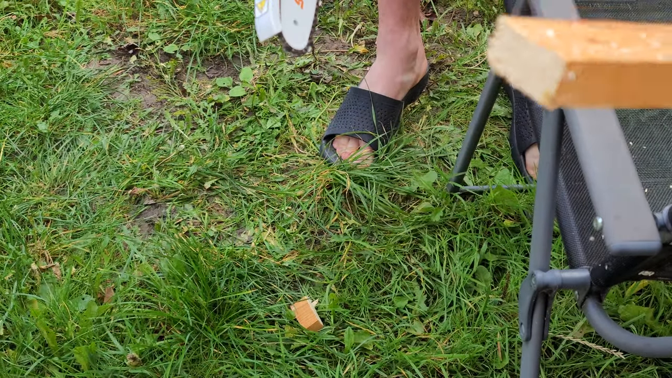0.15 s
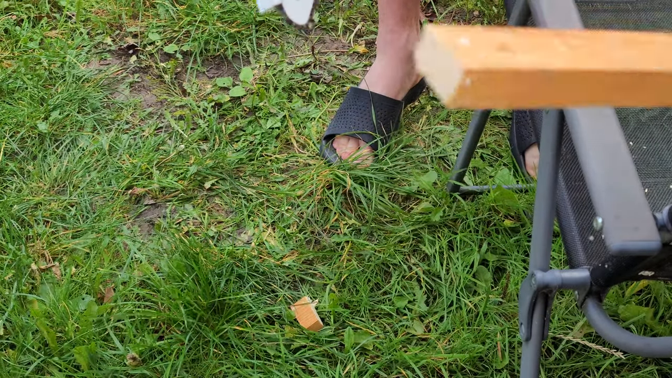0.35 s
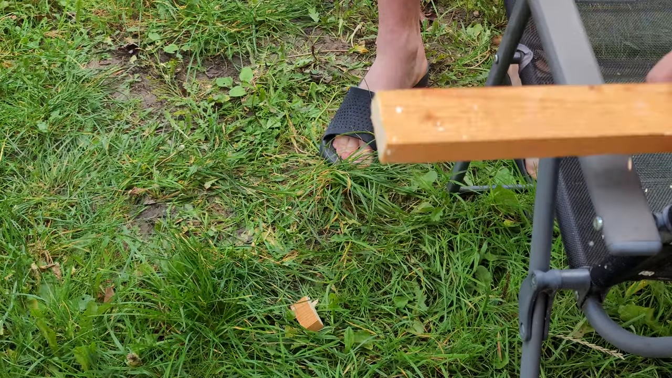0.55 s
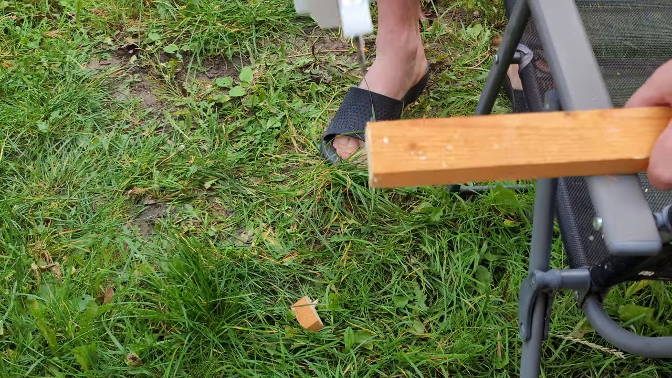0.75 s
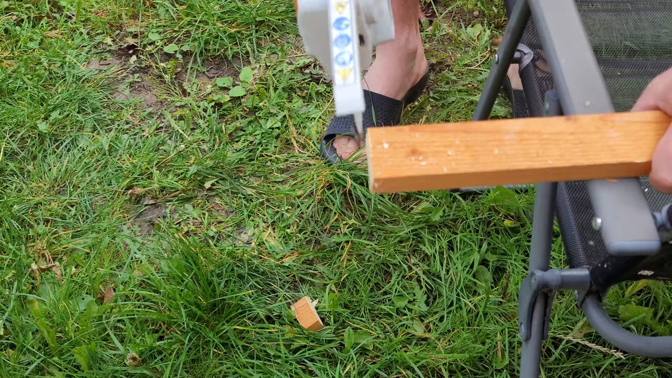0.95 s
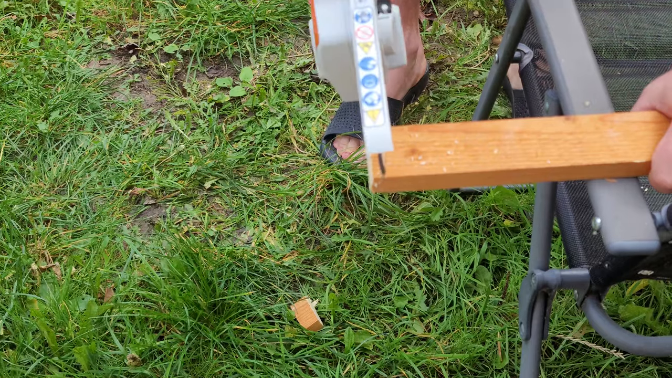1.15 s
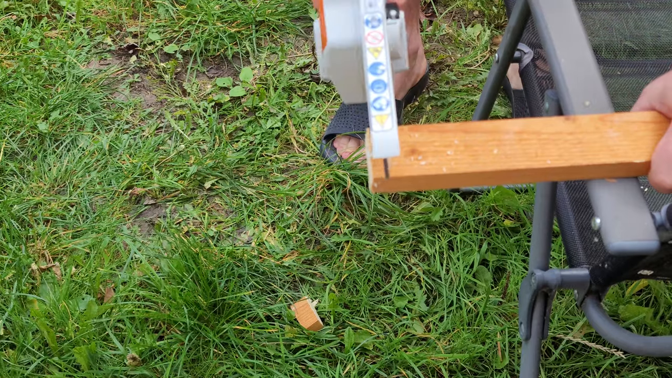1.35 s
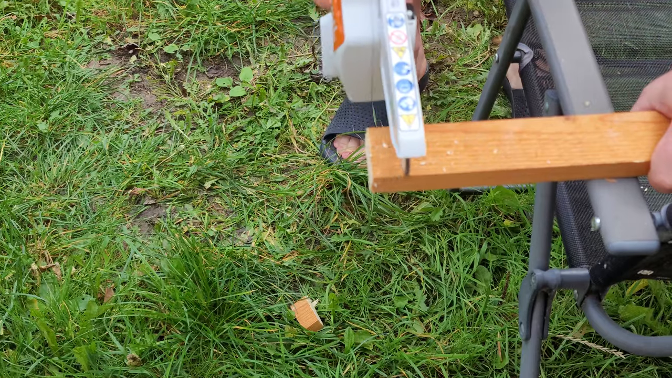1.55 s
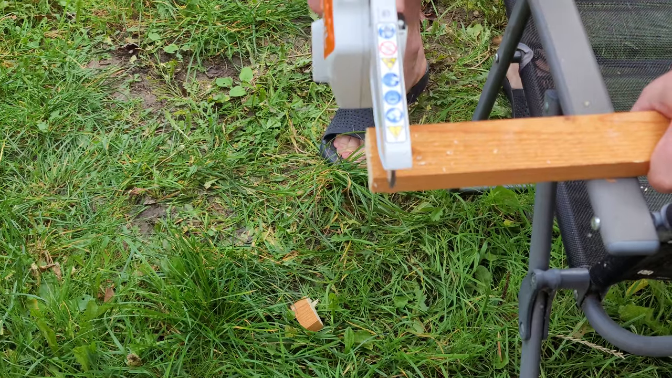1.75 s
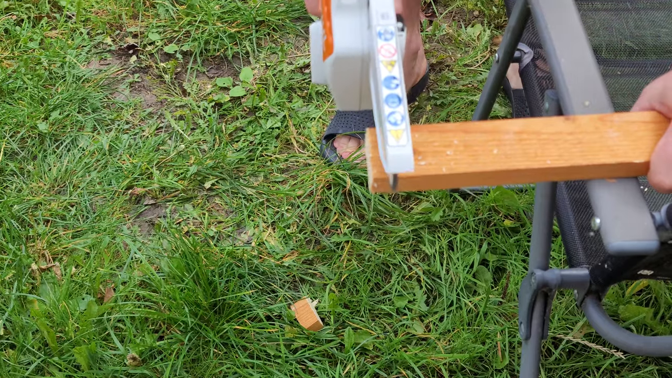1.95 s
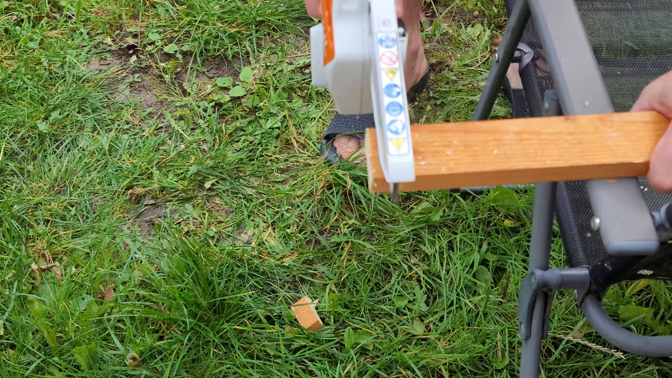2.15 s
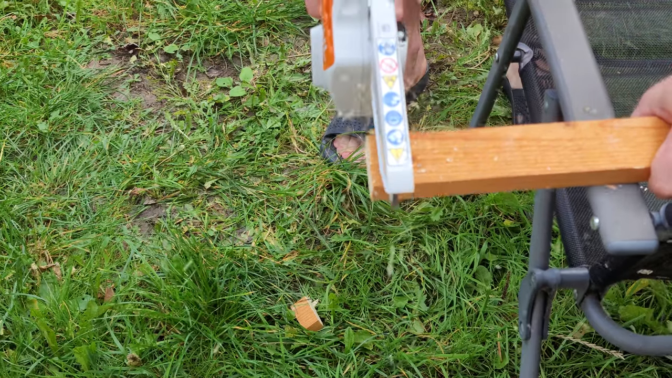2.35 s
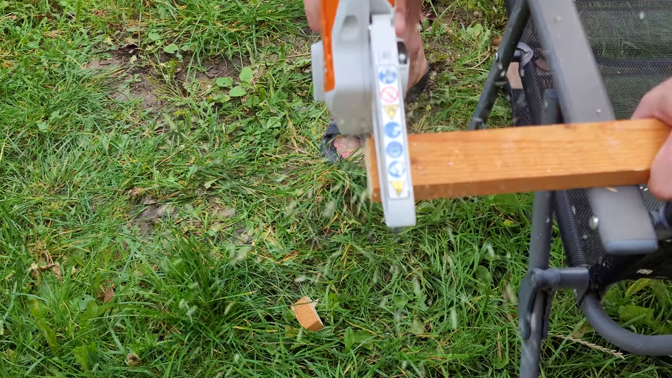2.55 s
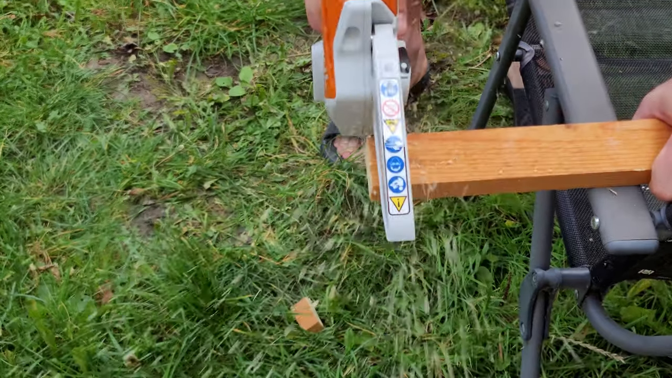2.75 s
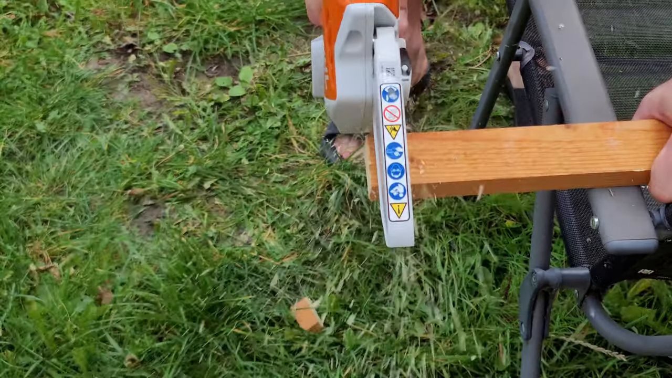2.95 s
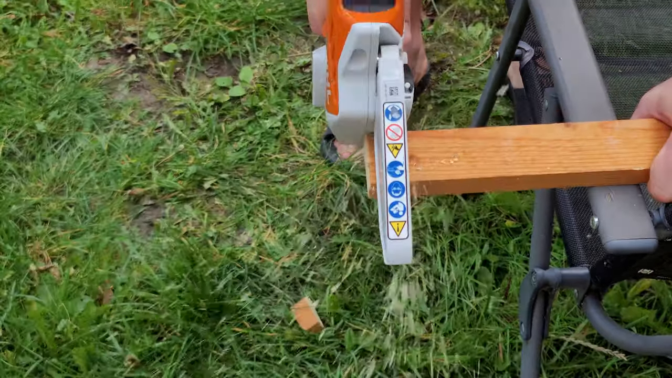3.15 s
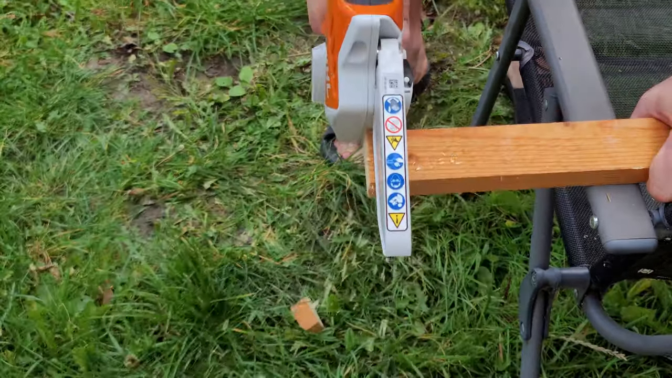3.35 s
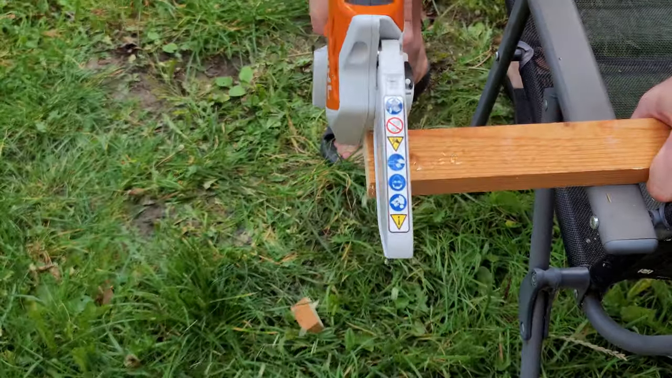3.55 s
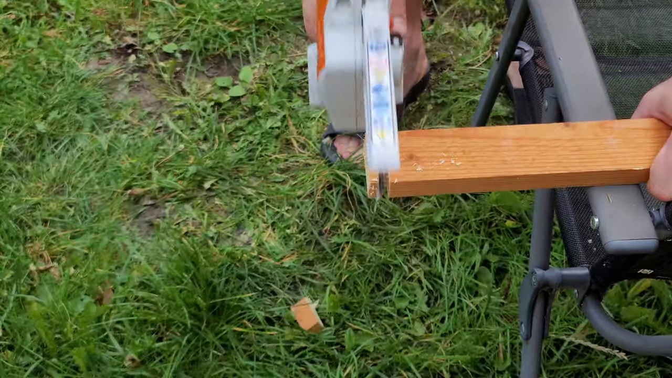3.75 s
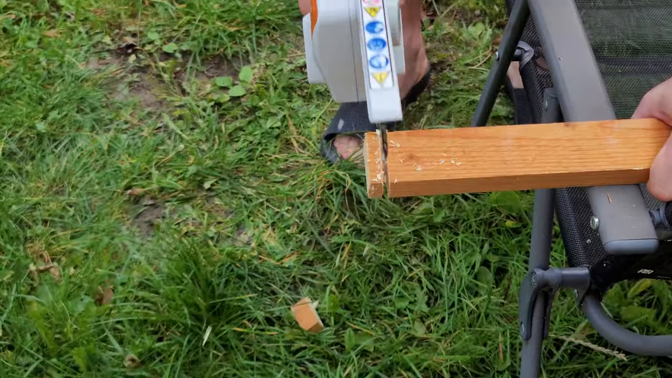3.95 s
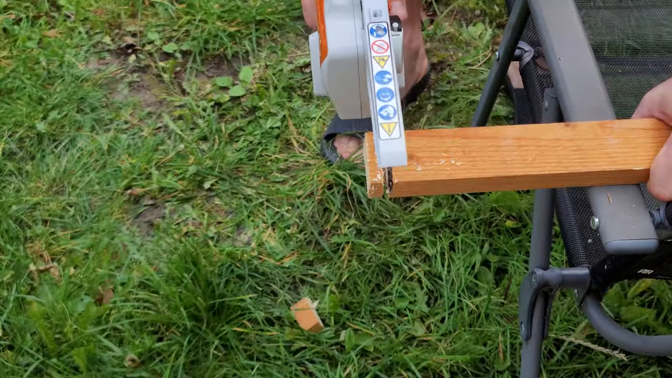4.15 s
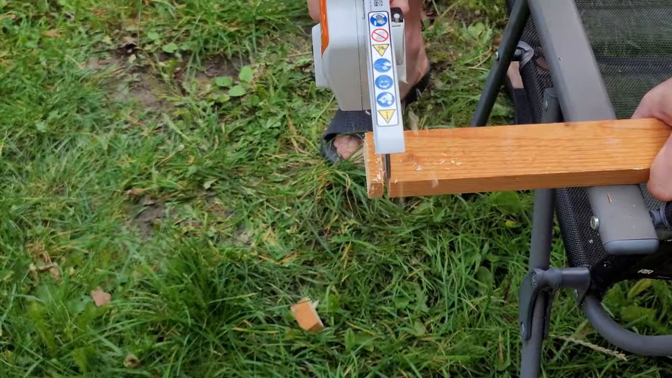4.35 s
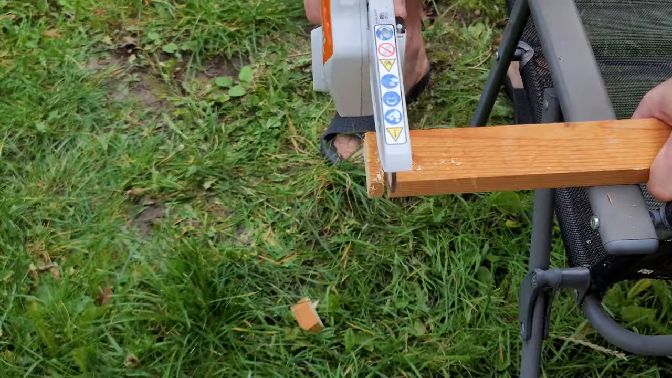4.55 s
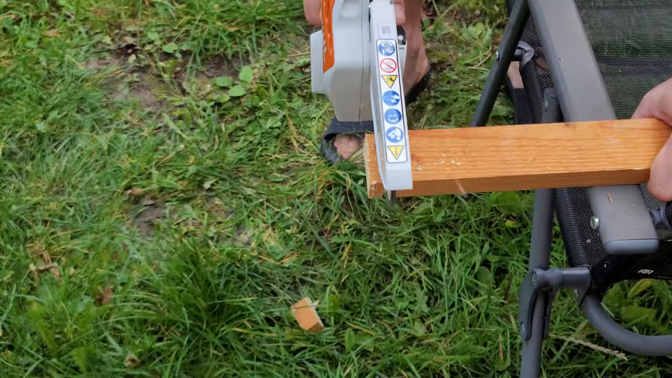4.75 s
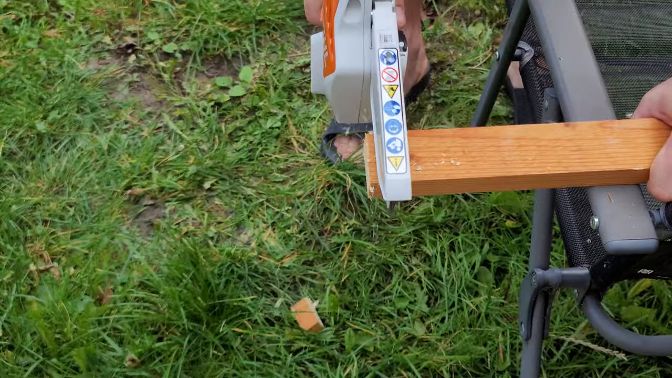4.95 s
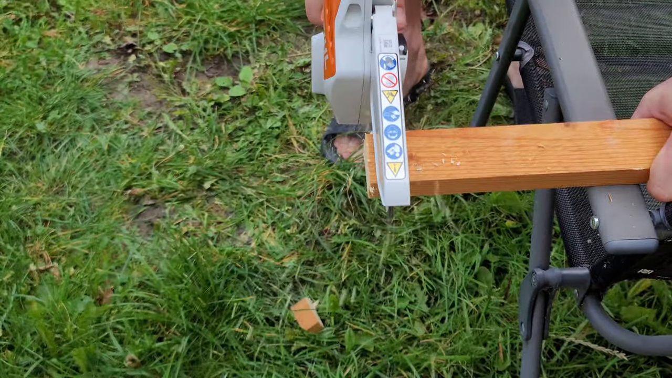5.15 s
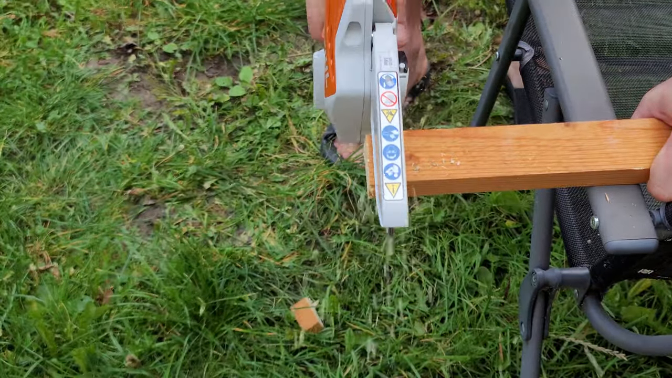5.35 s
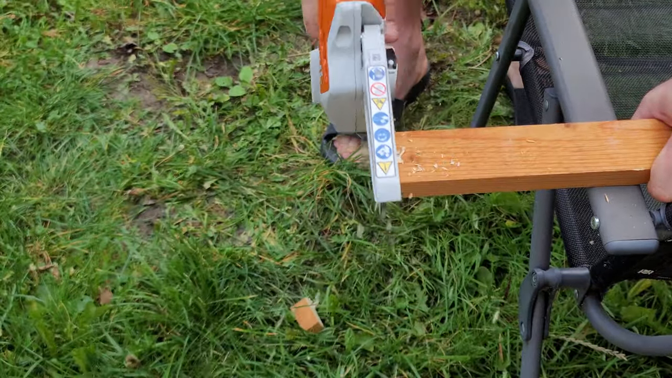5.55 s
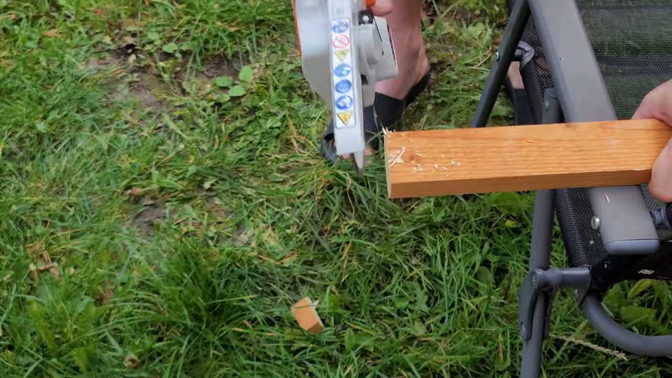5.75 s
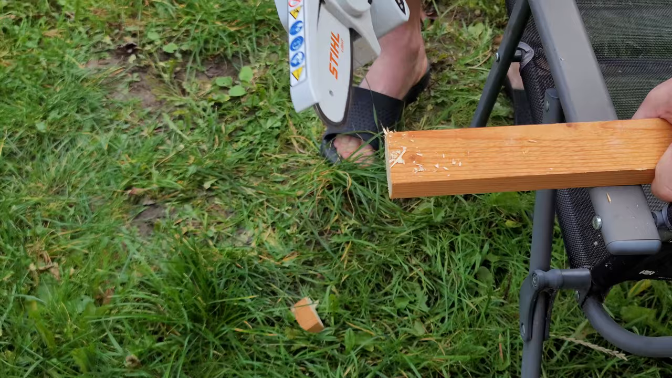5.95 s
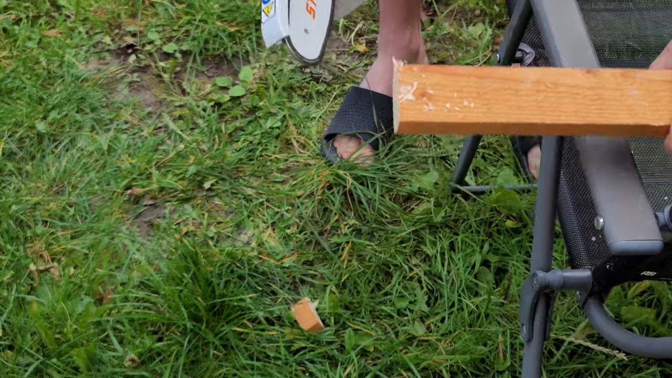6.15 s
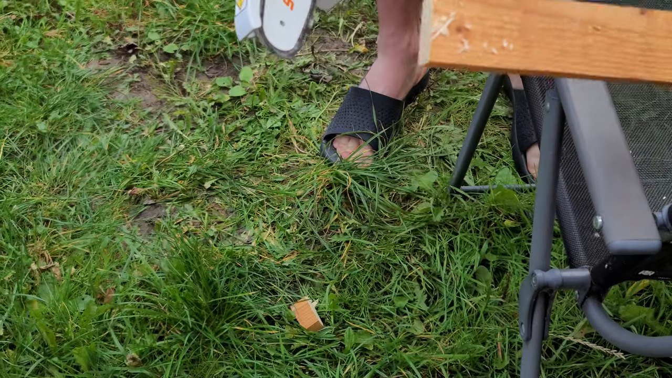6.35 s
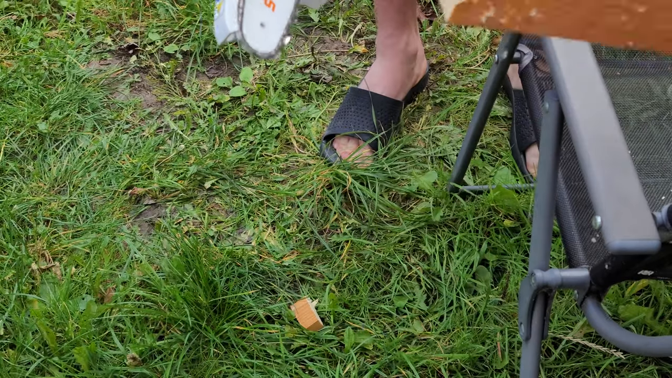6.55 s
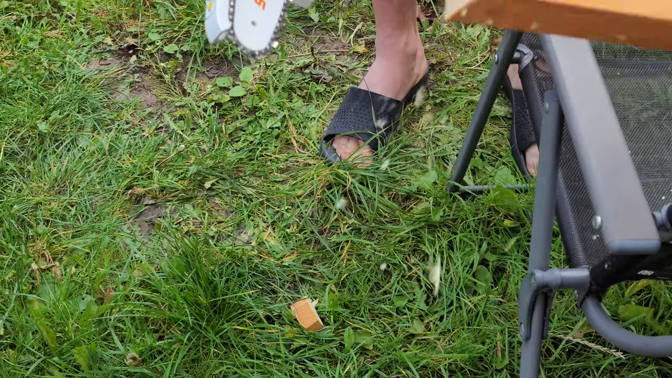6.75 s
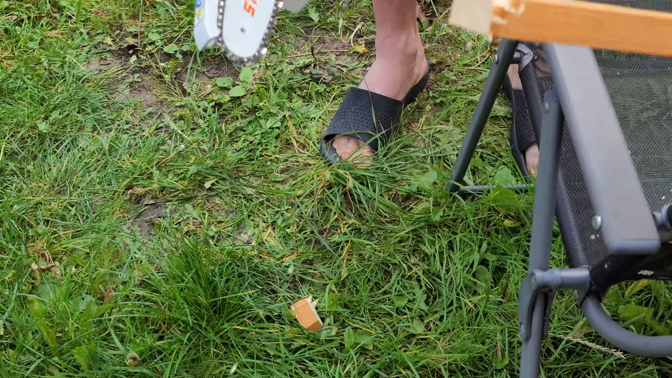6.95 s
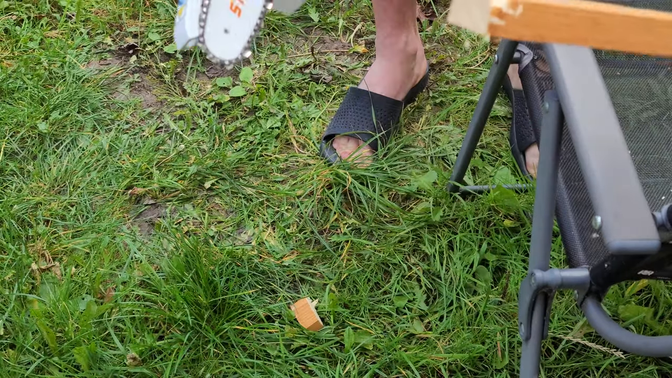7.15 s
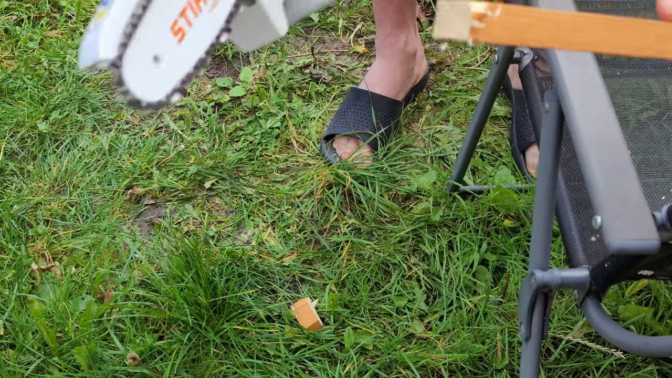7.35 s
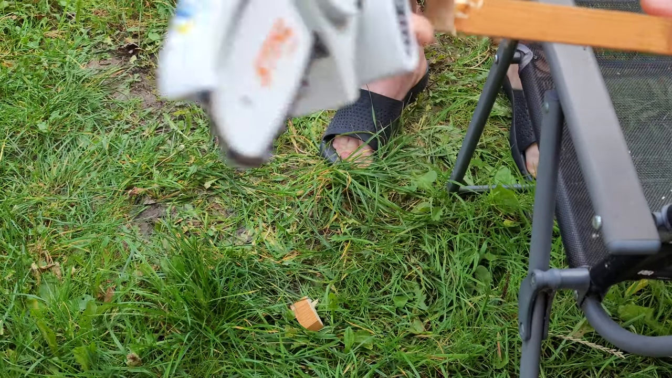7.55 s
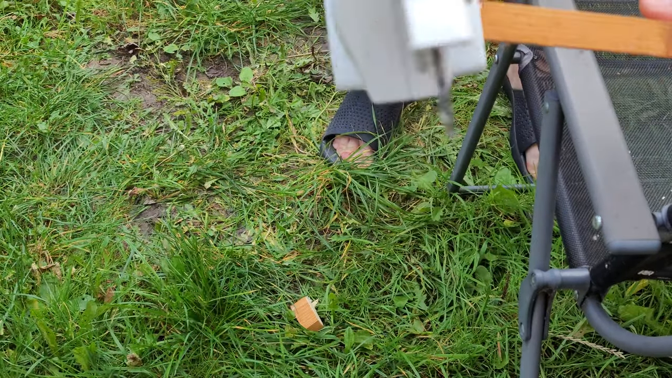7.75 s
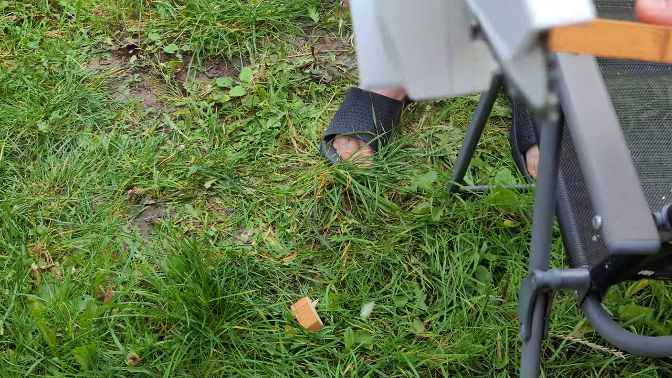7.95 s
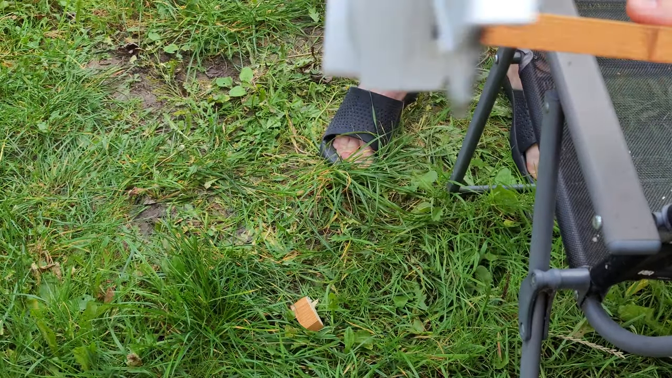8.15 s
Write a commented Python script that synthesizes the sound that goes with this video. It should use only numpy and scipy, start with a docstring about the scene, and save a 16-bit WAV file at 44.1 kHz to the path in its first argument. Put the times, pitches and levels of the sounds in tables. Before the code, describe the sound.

Two short bursts of a small electric chainsaw cutting wood in light wind, the first stalling, the second ending in a loud knock.

```python
"""On a lawn in light wind, a stereo microphone close to a small battery chainsaw and a hand-held board.
Wind puffs on the ports and the board knocks on a garden chair. At 1.1 s the saw spins up, links clattering;
its cutters tear into the wood, then it bogs down, squeals, stalls at 3.3 s and scrapes back out.
At 4.2 s it starts again, breaks through with a loud knock at 5.3 s and coasts to rest on a slack chain.
The board knocks again, and at 7.3 s something clinks far off."""
import sys
import numpy as np
from scipy import signal
from scipy.fft import rfft, irfft, next_fast_len
from scipy.io import wavfile
from scipy.ndimage import uniform_filter1d, map_coordinates

SR = 44100
rng = np.random.default_rng(int(sys.argv[2]) if len(sys.argv) > 2 else 0)


def log_audio(samples):
    """Write samples as a 16-bit WAV file to the path given in sys.argv[1]."""
    # one column per channel
    frames = np.atleast_2d(samples).T
    # limit to full scale, then quantise
    limited = np.clip(frames, -1, 1)
    pcm = np.round(limited * 32767).astype(np.int16)
    wavfile.write(sys.argv[1], SR, pcm)


N = 360738
T = np.arange(N) / SR
FREE_SPEED, LOOP_TURNS = 95, 28 / 6  # sprocket turns: per second unloaded, per lap of the chain


def amp(db):
    """Decibels to gain."""
    return 10 ** (np.asarray(db) / 20)


def unit(x):
    """Scale to rms 1."""
    return x / np.sqrt(np.mean(x ** 2) + 1e-20)


def along(points, hz):
    """(Hz, value) points read on a log axis."""
    f, v = np.transpose(points)
    return np.interp(np.log(hz + 1), np.log(f + 1), v)


def swell(s, half):
    """A bell of height 1 round time s."""
    return np.exp(-((T - s) / half) ** 2)


def wobble(rate):
    """A smooth random curve, rate knots a second."""
    return map_coordinates(rng.standard_normal(int(N * rate / SR) + 4), [T * rate])


def noise():
    """Two unrelated channels of white noise."""
    return rng.standard_normal((2, N))


def filtered(x, response):
    """x times a response of frequency."""
    m = next_fast_len(N + SR // 4)
    return irfft(rfft(x, m) * response(np.fft.rfftfreq(m, 1 / SR)), m)[..., :N]


def coloured(x, spectrum):
    """x through a (Hz, dB) spectrum."""
    return filtered(x, lambda hz: amp(along(spectrum, hz)))


def resonate(x, modes):
    """x through a body's (Hz, width, dB) resonances, alternating in sign."""
    return filtered(x, lambda f: sum((-1) ** k * amp(db) * 1j * f * w / (hz * hz - f * f + 1j * f * w)
                                     for k, (hz, w, db) in enumerate(modes)))


def spread(pair, likeness):
    """Two unrelated signals become left and right of a given likeness."""
    turn = lambda hz: np.arccos(np.clip(along(likeness, hz), -1, 1)) / 2
    mid, side = filtered(pair, lambda hz: np.array([np.cos(turn(hz)), np.sin(turn(hz))]))
    return np.array([mid + side, mid - side])


def narrow(hz, width):
    """Stereo noise in one narrow resonance."""
    return unit(spread(resonate(noise(), [(hz, width, 0)]), [(1000, 0.98)]))


def steady(x):
    """Bring the slow level of x to 1, keeping its fast grain."""
    power = np.abs(uniform_filter1d(np.mean(x ** 2, axis=0), SR // 12))
    return x / np.sqrt(power + power.mean() / 100)


# The air all round the lawn: (frequency [Hz], level [dB])
HUSH_SPECTRUM = [(24, -24), (40, -7.5), (91, -22), (162, -23.5), (255, -23), (344, -23.5), (380, -22),
                 (410, -27.5), (453, -24), (611, -23.5), (912, -29.5), (1030, -29), (2670, -33.5),
                 (6900, -32), (8600, -35.5), (9400, -44), (13000, -39.5), (15800, -51)]
# That air across the microphone: (frequency [Hz], left-right likeness [-1..1])
HUSH_LIKENESS = [(60, 0.66), (240, 0.97), (950, -0.46), (3770, 0.015), (15000, 0.032)]
# Faint clinks, far off: (time [s], frequency [Hz], level [dB], t60 [s])
FAR_CLINKS = [(7.26, 4200, -56, .25), (7.31, 2330, -52, .2)]
def garden():
    """Even outdoor hush and two far clinks."""
    hush = amp(-50.5) * unit(spread(coloured(noise(), HUSH_SPECTRUM), HUSH_LIKENESS))
    clinks = sum(amp(db - 60 * np.abs(T - s) / t60) * np.clip((T - s) / 0.0046, 0, 1) * narrow(hz, 88)
                 for s, hz, db, t60 in FAR_CLINKS)
    return hush + clinks


# Light air right on the microphone: (time [s], relative level [dB])
BREEZE_LEVELS = [(0.0, -60), (0.62, -44), (0.75, -49), (2.39, -65.5), (2.98, -42), (3.89, -45),
                 (4.83, -40.5), (4.94, -50), (8.18, -64)]
# Stronger puffs: (time [s], half length [s], level [dB], added right and taken from left [dB])
WIND_PUFFS = [(.2, 0.16, -40.5, 10), (0.758, .05, -39, 7.5), (0.928, 0.058, -35, 10),
              (1.098, .04, -41, 10.5), (1.265, 0.061, -44.5, 9), (1.543, 0.11, -48.5, 7),
              (2.737, 0.035, -33.5, 9), (2.925, 0.065, -38, 9.5), (3.153, 0.046, -39, 12),
              (3.504, 0.033, -37, 7), (3.835, 0.049, -40.5, 4), (4.174, 0.066, -37.5, -2),
              (4.71, 0.07, -43, -7.5), (4.92, .05, -38, 3.5), (5.472, 0.1, -45.5, 9),
              (6.079, 0.04, -35, 3.5), (6.23, 0.039, -38.5, 8), (6.454, .1, -53, -6)]
# Rumble at the ports: (frequency [Hz], level [dB])
BUFFET_SPECTRUM = [(15, -11), (45, 2.5), (80, -1.5), (140, -16), (240, -32), (700, -88)]
def wind():
    """A light breeze and single puffs buffet each microphone port on its own."""
    ports = np.array([[-1], [1]])
    breeze = amp(np.interp(T, *np.transpose(BREEZE_LEVELS)) - 3 + 2 * ports)
    puffs = sum(amp(db + right_db * ports) * swell(s, half) for s, half, db, right_db in WIND_PUFFS)
    lumps = amp(3.8 * np.array([wobble(14), wobble(14)]))
    return (breeze + puffs) * unit(lumps * coloured(noise(), BUFFET_SPECTRUM))


# Trigger and plastic housing, close by: (time [s], relative level [dB])
PLASTIC_TICKS = [(1.075, -25), (4.164, -27), (8.085, -24)]
# Handling, mostly in the right channel: (time [s], relative level [dB], frequency [Hz])
HANDLING_THUMPS = [(0.107, -22.5, 151), (0.626, -25, 45), (0.862, -24.5, 65), (.93, -31, 55),
                   (1.378, -23.5, 111), (4.43, -25.5, 109), (5.412, -27, 129)]
def handling():
    """Small plastic ticks and soft low thumps."""
    out = np.zeros((2, N + SR))
    t = T[:SR // 8]
    for s, db in PLASTIC_TICKS:
        tick = 0.15 * rng.standard_normal((2, len(t))) + 0.046 * np.sin(2 * np.pi * 1550 * t)
        out[:, round(s * SR):][:, :len(t)] += amp(db - 60 * t / 0.074) * tick
    rise = t / 0.0041
    for s, db, hz in HANDLING_THUMPS:
        thump = amp(db) * rise * np.exp(1 - rise) * np.sin(2 * np.pi * hz * t)
        out[:, round(s * SR):][:, :len(t)] += thump * amp([[-16], [2]])
    return out[:, :N]


# Board, bar and garden chair meet: (time [s], relative level [dB], hollow ring offset [dB])
BOARD_KNOCKS = [(0.688, -19.5, -19), (0.716, -29.5, -13), (3.631, -30.5, -20), (3.677, -23, -19),
                (5.31, -10, -28), (5.335, -20, -8), (5.447, -21.5, -37), (6.536, -24.5, -5.5),
                (6.614, -39, -20), (6.682, -35, -13)]
# The struck board: (frequency [Hz], level [dB], t60 [s])
KNOCK_MODES = [(505, 2, 0.19), (724, -3, 0.14), (1094, -4, .11), (1790, -5.5, 0.12), (2250, -29, .08),
               (3960, -2, .06)]
# The dry clack: (frequency [Hz], level [dB])
CLACK_SPECTRUM = [(180, -10), (300, -12), (356, -14), (844, -9.5), (1240, -13.5), (1800, -13), (2950, -20),
                  (7000, -29.5), (12000, -40), (15600, -66), (22000, -120)]
# Clacks and chain across the microphone: (frequency [Hz], left-right likeness [-1..1])
CLATTER_LIKENESS = [(200, 1), (700, 0.31), (1500, 0.59), (4000, 0.41), (8000, 0.07), (15000, 0.16)]
def knocks():
    """Each contact is a dry, slightly dragging clack and a short hollow ring of the board."""
    burst, ring = np.zeros(N), np.zeros((2, N))
    t = T[:SR // 4]
    rise = 1 - np.exp(-t / .002)
    for s, db, hollow_db in BOARD_KNOCKS:
        span = slice(round(s * SR), round(s * SR) + len(t))
        burst[span] += rise * amp(db - 18) * (amp(-60 * t / 0.061) + amp(-0.5 - 60 * t / 0.21))
        for hz, mode_db, t60 in KNOCK_MODES:
            start_db = db + hollow_db + mode_db - 12 + rng.normal(0, 2.3, (2, 1))
            ring[:, span] += rise * amp(start_db - 60 * t / t60) * np.sin(2 * np.pi * hz * t)
    return ring + burst * unit(spread(coloured(noise(), CLACK_SPECTRUM), CLATTER_LIKENESS))


# Short squeals under load: the gear whines, then the chain binds in the kerf:
# (time [s], frequency [Hz], level [dB], half length [s])
STRAIN_SQUEALS = [(2.884, 3330, -27, .05), (2.99, 1934, -24, 0.036), (3.026, 1220, -25.5, 0.063),
                  (3.13, 1137, -22.5, 0.054), (3.254, 1366, -34.5, 0.027), (5.331, 1350, -25.5, 0.014)]
# The saw is drawn back: (time [s], level [dB])
SCRAPE_LEVELS = [(3.27, -57), (3.55, -54), (3.75, -49.5), (3.84, -51), (3.95, -52.5), (4.2, -50.5)]
# The bar rubbing on wood: (frequency [Hz], level [dB])
SCRAPE_SPECTRUM = [(300, -29), (1500, 3), (4200, 0.5), (7500, 3), (10000, -7), (15000, -8)]
def strain():
    """Gear and chain squeal under load in short swells; after the stall the bar scrapes back out."""
    squeals = sum(amp(db) * swell(s, half) * narrow(hz, width=76) for s, hz, db, half in STRAIN_SQUEALS)
    pull = amp(np.interp(T, *np.transpose(SCRAPE_LEVELS), left=-120, right=-120))
    return squeals + pull * amp(1.7 * wobble(24.95)) * unit(coloured(noise(), SCRAPE_SPECTRUM))


# The trigger: (pulled [s], released [s], relative chain level at full speed [dB])
TRIGGER_PULLS = [(1.095, 3.318, -30), (4.185, 5.35, -30.5)]
# The wood's resistance, one list a cut: (time [s], share of speed lost [0..1])
WOOD_LOADS = [
    [(2.0, 0), (2.22, .03), (2.55, .2), (2.88, .305), (3.05, .495), (3.15, .76), (3.21, .905), (3.27, .905),
     (3.31, 1)],
    [(4.79, 0), (4.88, .05), (5.0, .108), (5.32, .117)],
]
def motor():
    """The sprocket spins up, sags under load and coasts: speed [turns/s], chain gain, slackness."""
    speed, rattle, slack = np.zeros((3, N))
    spin_up, drag, friction = 460, 1.2, .28  # turns/s^2; 1/s; dry friction over the drag at release
    crawl_share = 0.19  # below this share of full speed the driven links barely strike
    for (pulled, released, db), load in zip(TRIGGER_PULLS, WOOD_LOADS):
        ramp = np.maximum(T - pulled, 0) * spin_up / FREE_SPEED
        driven = ramp / (1 + ramp ** 5) ** (1 / 5)
        coast = np.maximum((1 + friction) * np.exp(-drag * np.maximum(T - released, 0)) - friction, 0)
        share = driven * coast * (1 - np.interp(T, *np.transpose(load)))
        loose = np.clip((T - released) / 0.045, 0, 1)  # with the motor off the chain hangs slack
        taut_gain = np.clip(share / crawl_share, 0, 1) * amp(-14.5 * (1 - share))
        speed += FREE_SPEED * share
        rattle += amp(db) * ((1 - loose) * taut_gain + loose * share ** 1.14)
        slack += (share > 0) * loose
    return speed, rattle, slack


def tones(turns, orders, waver, flutter_db, rate=20):
    """Lines locked to the sprocket, each wavering and reaching the two ports at its own phase."""
    out = np.zeros((2, N))
    for multiple, db in orders:
        phase = 2 * np.pi * multiple * turns + waver * wobble(rate) + rng.normal(0, 0.46, (2, 1))
        out += amp(db + flutter_db * wobble(rate)) * np.sin(phase)
    return out


def contacts(turns, fresh, uneven_db, count):
    """Two trains of impacts: count spots round the chain strike on every lap, each lap partly anew."""
    laps = int(turns[-1] / LOOP_TURNS) + 1
    spots = (np.arange(laps)[:, None] + rng.random(count)) * LOOP_TURNS
    when = np.round(np.interp(spots.ravel(), turns, np.arange(N))).astype(int)
    repeating = np.sqrt(1 - fresh) * rng.standard_normal((2, 1, count))
    sizes = repeating + np.sqrt(fresh) * rng.standard_normal((2, laps, count))
    sizes = sizes * amp(uneven_db * rng.standard_normal((laps, count))) * (spots < turns[-1])
    return np.array([np.bincount(when, s.ravel(), N) for s in sizes])


def steel(x, ring_db, t60, dispersion):
    """Impacts travel through steel: treble runs ahead of bass, and countless weak modes ring on."""
    t = T[:SR // 16]
    tail = rng.standard_normal((2, len(t))) * amp(-60 * t / t60)
    tail = amp(ring_db) * tail / np.linalg.norm(tail[0])
    smeared = filtered(x, lambda hz: np.exp(-1j * dispersion * np.sqrt(hz)))
    return unit(smeared + signal.fftconvolve(smeared, tail, axes=1)[:, :N])


# The grind as heard outside the gearbox: (frequency [Hz], gain [dB])
GEARBOX_RESPONSE = [(400, -30), (800, -8), (1100, -2), (1600, -3), (2250, 8), (2800, -3), (3400, 0),
                    (4200, 7), (4900, -5)]
def gear(speed, turns, rattle, tear):
    """The reduction gear sings at speed and in the cut, and grinds under torque, as in spinning up."""
    teeth, share = 51, speed / FREE_SPEED
    spin_up = np.clip(uniform_filter1d(np.gradient(share) * SR, SR // 30), 0, None)
    mesh = amp(-9) * share ** 8 * tones(turns, [(teeth, 0)], waver=.6, flutter_db=2.5)
    strained = amp(-15) * share * tones(turns, [(teeth, 0)], waver=1.0, flutter_db=3, rate=150)
    grind_orders = [(teeth, 0), (teeth - 6, -5), (teeth + 6, -5), (2 * teeth, -13)]
    grind = tones(turns, grind_orders, waver=1.4, flutter_db=3, rate=280)
    torque = amp(-44) * spin_up ** .6 * np.clip(speed / 18, 0, 1) ** 2 + amp(-14) * tear * (1 - share)
    return rattle * mesh + tear * strained + coloured(torque * grind, GEARBOX_RESPONSE)


# The chain close by, running fast and running slowly: (frequency [Hz], level [dB])
FAST_CHAIN = [(120, -62), (200, -53), (293, -14), (333, -24.5), (517, -18), (566, -21), (667, -28),
              (745, -7), (801, -11), (1180, -6), (1630, -2), (1890, -0.5), (3210, -5.5), (6780, -4.5),
              (15700, -11.5)]
SLOW_CHAIN = [(180, -50), (300, -29), (404, -41), (446, -19), (527, -22.5), (852, -21.5), (1170, -4.5),
              (1470, -14.5), (1790, -6.5), (2630, -7), (4390, -13), (6860, -9.5), (9400, -14.5),
              (15700, -17.5)]
# Guide bar and housing: (frequency [Hz], width [Hz], level [dB])
HOUSING_MODES = [(1190, 510, -10), (1900, 26, -5), (4130, 66, -5), (6770, 220, 8.5), (8540, 180, -6)]
# Whine of motor and chain when driven; whirr of the chain when coasting: (order [per turn], level [dB])
WHINE_ORDERS = [(3.2, -18.5), (6, -11), (8, -10.5), (9, -12), (12, -5), (12.8, -12), (14, -1), (18, -14),
                (20, 3), (22, -3), (24, -2), (26, -13), (30, -8.5), (39, -4.5)]
WHIRR_ORDERS = [(4.8, -18), (9, -5), (15, -6.5), (18, -3), (24, -1), (33, -10), (36, -2), (42, -13)]
def chain(speed, turns, rattle, slack):
    """Links clatter over sprocket and bar as the drive whines; coasting, they dull and part into ticks."""
    pace = np.clip(speed / FREE_SPEED, 0, 1) ** 2
    clatter = steady(contacts(turns, fresh=.25, uneven_db=1, count=420)) + amp(-4) * noise()
    ticks = contacts(turns, fresh=.7, uneven_db=1, count=28)
    ticks = steady(steel(ticks, ring_db=12, t60=.035, dispersion=0))
    ticks = coloured(ticks, [(1000, 0), (3300, 0.16), (5000, -1)])
    clatter = steel(clatter, ring_db=-11, t60=.05, dispersion=3)
    links = spread(clatter + .25 * (1 - pace) * slack * ticks, CLATTER_LIKENESS)
    rasp = amp(5.5) * pace * unit(coloured(links, FAST_CHAIN))
    rasp += amp(7) * (1 - pace) * unit(coloured(links, SLOW_CHAIN))
    ring = amp(2) * unit(resonate(links, HOUSING_MODES))
    whine = amp(-8) * pace ** .75 * tones(turns, WHINE_ORDERS, waver=.25, flutter_db=2)
    whirr = tones(turns, WHIRR_ORDERS, waver=.3, flutter_db=1.5)
    whirr = amp(-6.5) * coloured(whirr, [(300, -18), (850, -4.5), (1400, 0)])
    moving = uniform_filter1d(np.clip(speed / 4, 0, 1), SR // 25)
    return moving * rattle * (rasp + ring + (1 - slack) * whine + slack * whirr)


# The bar in the board: (first touch [s], full bite [s], end [s], tearing [dB], shaking [dB])
BOARD_CUTS = [(1.9, 2.236, 3.27, -16.5, -27), (4.652, 4.93, 5.355, -19, -29.5)]
# The cutters catch for a moment: (time [s], half length [s], tearing [dB], shaking [dB])
CUTTER_SNAGS = [(2.756, 0.073, -30, -42), (3.135, .02, -30, -26), (3.273, 0.057, -42, -45),
                (4.689, 0.024, -21.5, -58), (4.838, 0.019, -23, -30.5), (4.96, 0.016, -29, -35),
                (5.115, 0.036, -30, -41), (5.307, 0.013, -25, -28), (5.463, 0.029, -23, -42.5)]
def feed(speed):
    """How hard the cutters tear and shake the board: they graze, bite, snag, and starve in the stall."""
    tear, shake = np.zeros((2, N))
    graze_db, edge_s, starve_speed = -15, 0.005, 57.4  # below this many turns/s ever less wood is cut
    moving = np.clip(speed / starve_speed, 0, 1) ** 1.1
    for (touch, bite, end, tear_db, shake_db), load in zip(BOARD_CUTS, WOOD_LOADS):
        engaged = moving * np.clip((T - touch) / edge_s, 0, 1) * np.exp(-np.maximum(T - end, 0) / edge_s)
        tear += engaged * amp(tear_db + np.interp(T, [touch, bite], [graze_db, 0]))
        shake += engaged * moving ** .5 * amp(shake_db) * np.interp(T, *np.transpose(load)) ** 0.28
    for s, half, tear_db, shake_db in CUTTER_SNAGS:
        snag = swell(s, half)
        tear += amp(tear_db) * snag
        shake += amp(shake_db) * snag
    return tear, shake


# Fibres tearing, close by: (frequency [Hz], level [dB])
TEAR_SPECTRUM = [(350, -30), (600, -23), (766, -6), (890, -16), (1410, -1.5), (1560, -13), (1880, 0.5),
                 (2160, -9), (4200, -8.5), (4940, -13.5), (6150, -6.5), (7640, -21), (8750, -11.5),
                 (9630, -16.5), (15500, -19)]
# The cut across the microphone: (frequency [Hz], left-right likeness [-1..1])
CUT_LIKENESS = [(200, 1), (640, 0.49), (1400, 0.22), (3000, 0.017), (15000, 0.2)]
# The bar ringing in the cut, and the board bending: (frequency [Hz], width [Hz], level [dB])
BAR_MODES = [(1070, 220, -8.5), (1438, 37, 6), (1905, 140, -9.5), (2343, 58, -0.5), (2710, 77, -1),
             (3220, 240, -7), (3870, 84, -14), (6120, 770, -30)]
BENDING_MODES = [(192.6, 31, -4.5), (459, 49, 0), (564, 14, 3), (738, 180, -2.5)]
# Tones of the cutters, three a turn: (order [per turn], level [dB])
CUTTER_ORDERS = [(3, -1), (6, -5), (9, -4), (12, -6.5), (15, -5), (18, 4), (21, 5)]
# How the board radiates those tones: (frequency [Hz], gain [dB])
BOARD_RADIATION = [(90, -12), (150, -2), (180, -11), (205, 3.5), (235, -18.5), (275, -11.5), (340, -14),
                   (430, -6.5), (600, -10), (1200, 0), (2500, -16)]
def cutting(speed, turns, tear, shake):
    """Cutters rip chips from the kerf; the blows ring the bar and bend the board."""
    share = speed / FREE_SPEED
    chatter = amp(0.34 * wobble(60) + 1.1 * wobble(17))
    chips = steady(contacts(turns, fresh=.4, uneven_db=1.5, count=300)) + amp(-5) * noise()
    chips = spread(steel(chips, ring_db=-12, t60=.04, dispersion=2.5), CUT_LIKENESS)
    blows = spread(steady(contacts(turns, fresh=.3, uneven_db=1, count=84)), CUT_LIKENESS)
    tearing = amp(-3) * unit(coloured(chips, TEAR_SPECTRUM)) + amp(-9) * unit(resonate(blows, BAR_MODES))
    dulled = coloured(tearing, [(3000, -1), (5500, -10)])  # slow cutters tear with less hiss
    tearing = share * tearing + (1 - share) * dulled
    bending = resonate(blows, BENDING_MODES)
    bending = amp(-4.5) * unit(coloured(bending, [(80, 11), (200, 2), (900, 7.5), (2000, -23)]))
    # as the saw bogs down the cutter rate falls into the board's lowest mode, and it growls
    cutters = share ** .5 * tones(turns, CUTTER_ORDERS, waver=.45, flutter_db=2, rate=45)
    growl = amp(0.5) * coloured(cutters, BOARD_RADIATION)
    slow_shake = uniform_filter1d(shake, SR // 7)
    return chatter * (tear * tearing + shake * bending + slow_shake * growl)


# The saw sits a little right of the microphone's centre: (frequency [Hz], left over right [dB])
SAW_BALANCE = [(200, 0), (700, -2.5), (1300, 0.3), (2400, -0.1), (4400, -1.5), (15000, -1.5)]
def scene():
    """The saw, played by its sprocket speed and its bite, in the garden."""
    speed, rattle, slack = motor()
    tear, shake = feed(speed)
    turns = np.cumsum(speed) / SR
    saw = chain(speed, turns, rattle, slack) + gear(speed, turns, rattle, tear)
    saw += cutting(speed, turns, tear, shake) + strain()
    saw = filtered(saw, lambda hz: amp(np.array([[.5], [-.5]]) * along(SAW_BALANCE, hz)))
    return saw + knocks() + handling() + garden() + wind()


def record(dry):
    """The microphone passes nothing above 15850 Hz."""
    return filtered(dry, lambda hz: hz < 15850)


dry = scene()
out = record(dry)
log_audio(out)
```